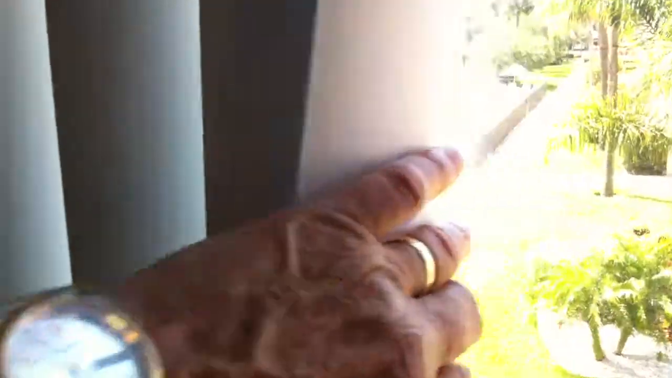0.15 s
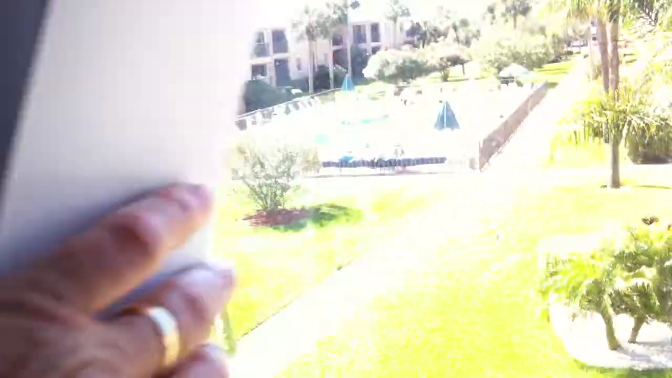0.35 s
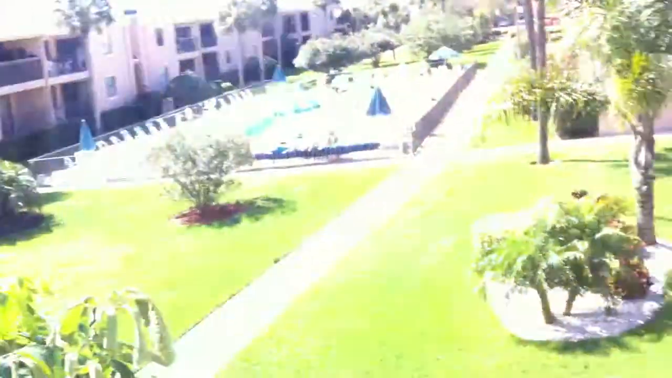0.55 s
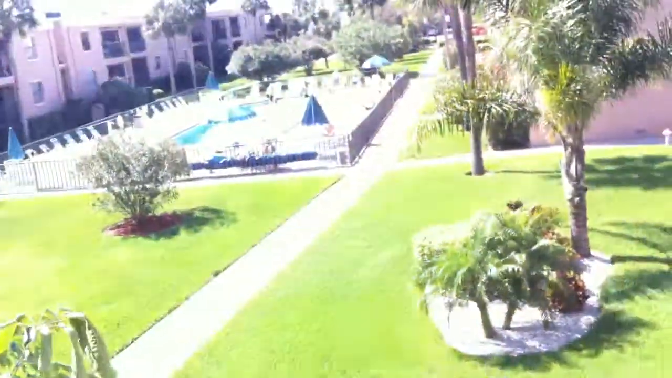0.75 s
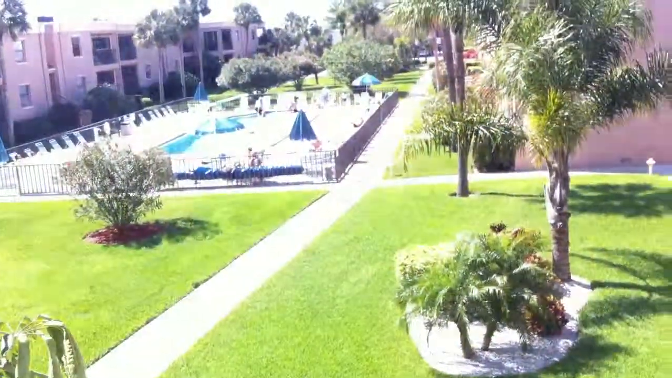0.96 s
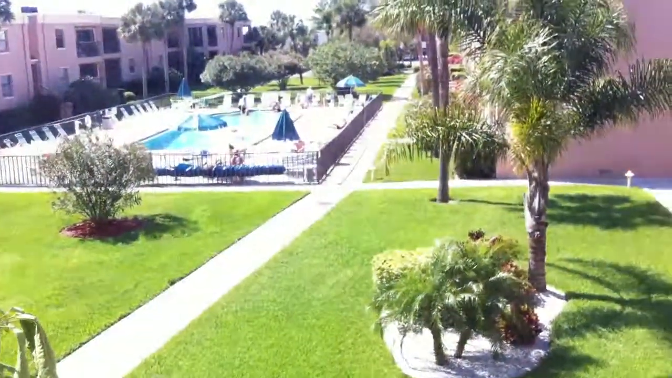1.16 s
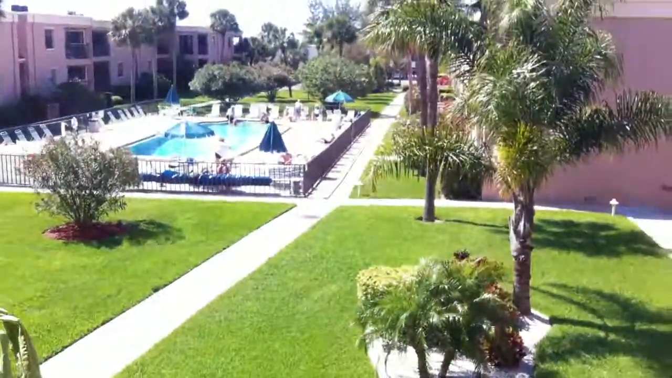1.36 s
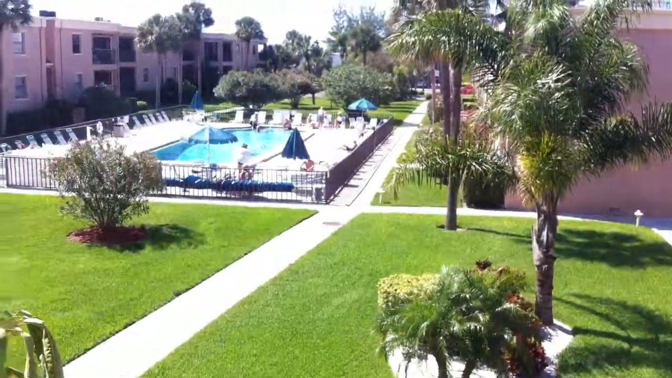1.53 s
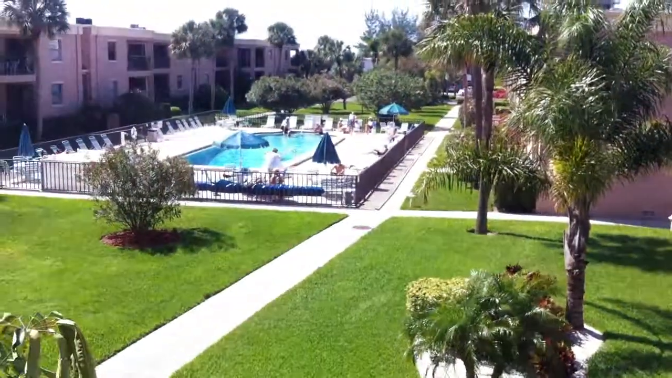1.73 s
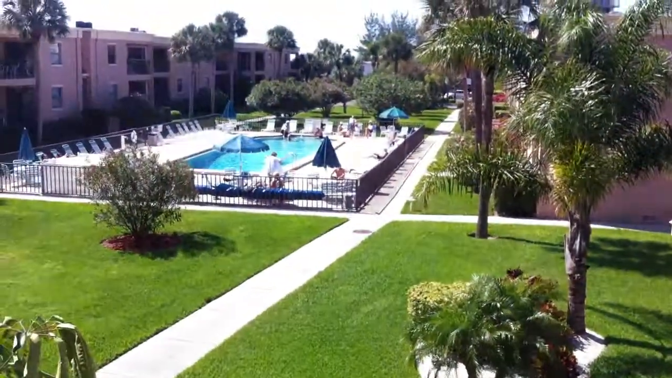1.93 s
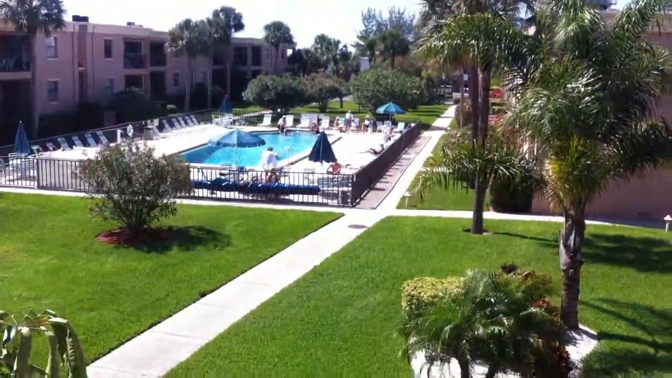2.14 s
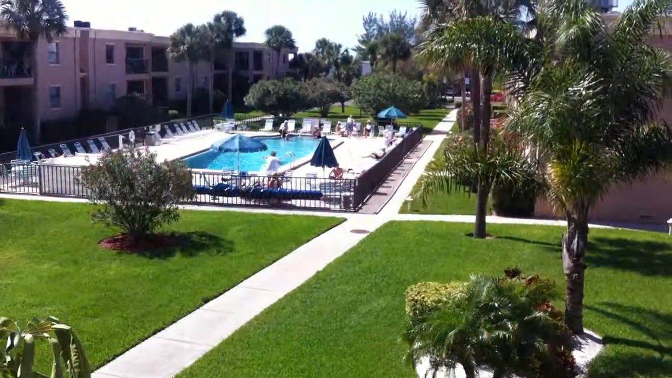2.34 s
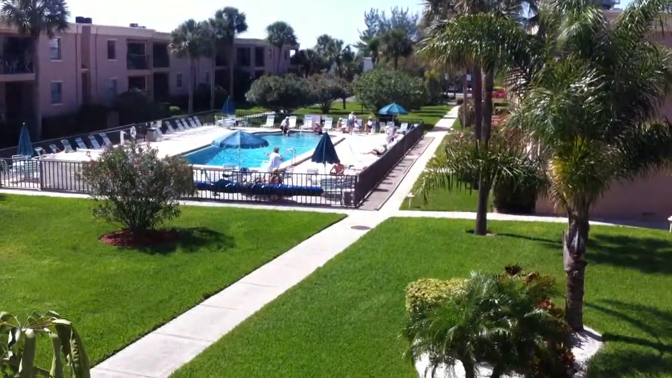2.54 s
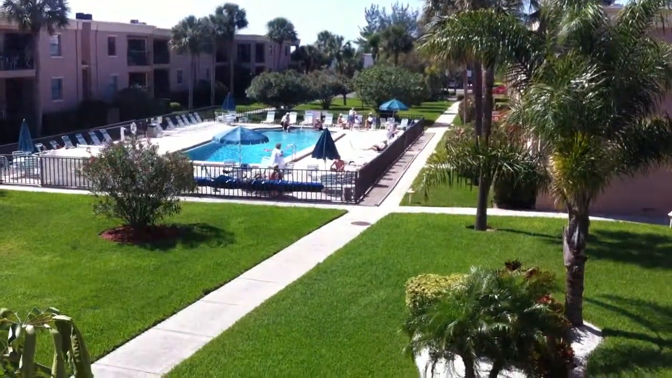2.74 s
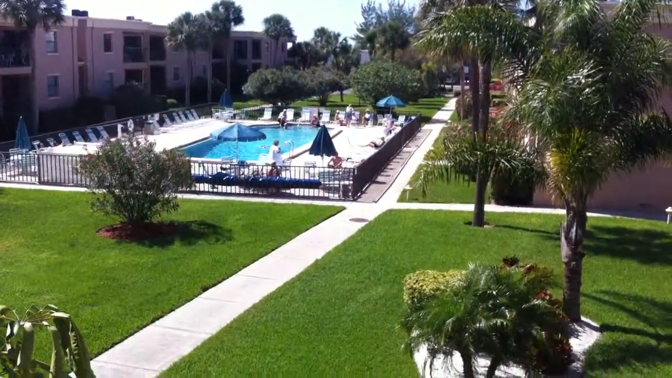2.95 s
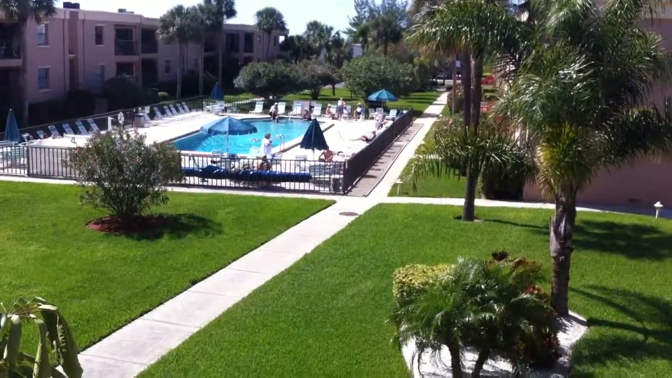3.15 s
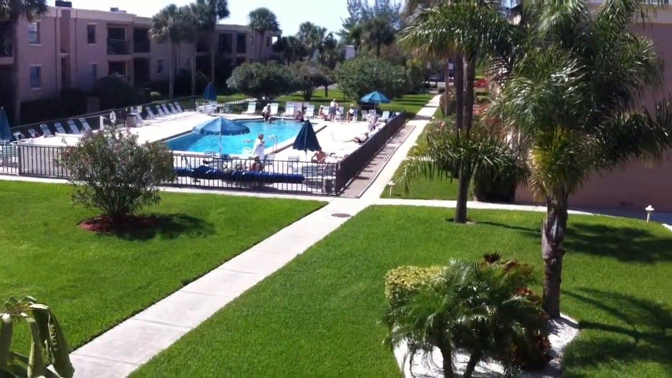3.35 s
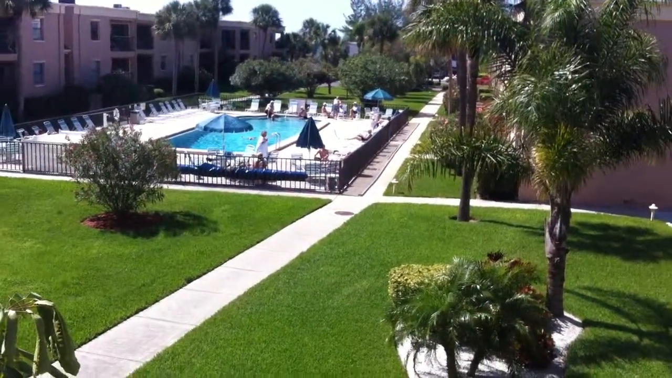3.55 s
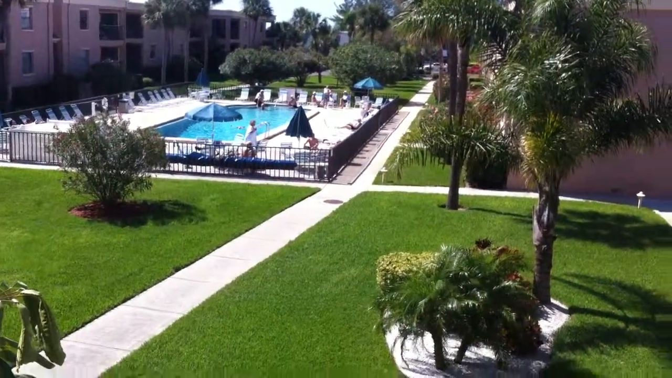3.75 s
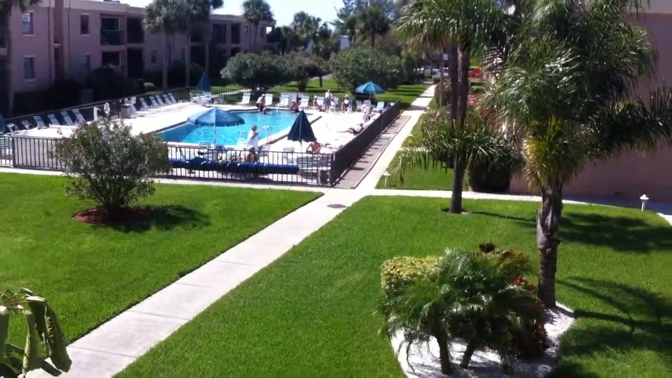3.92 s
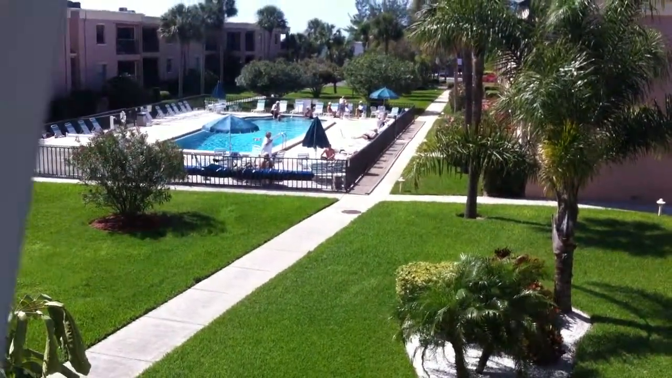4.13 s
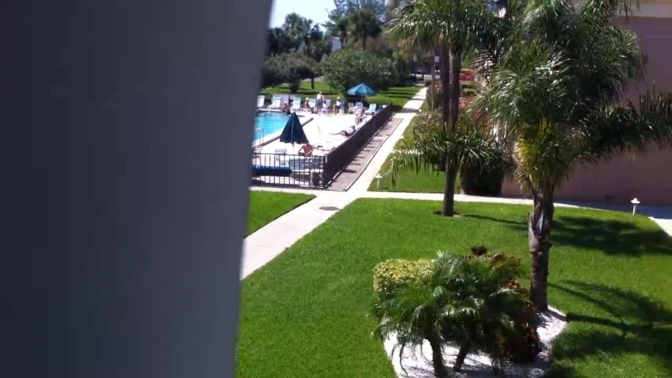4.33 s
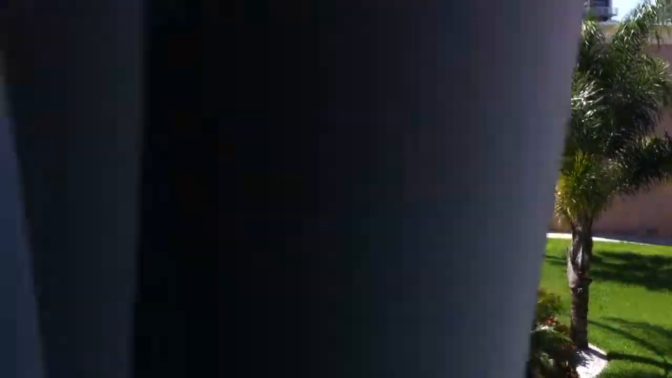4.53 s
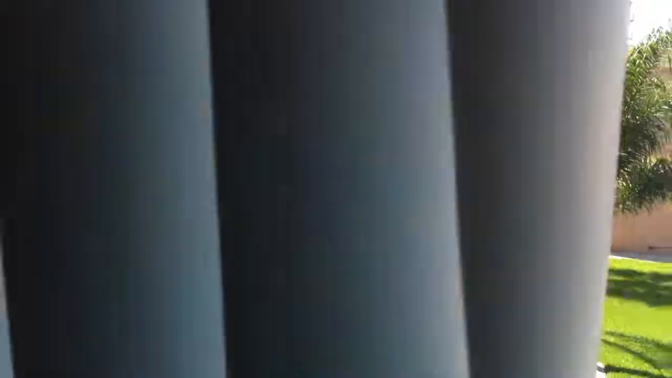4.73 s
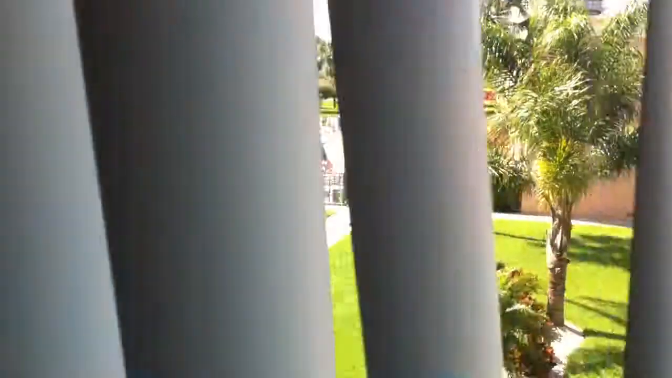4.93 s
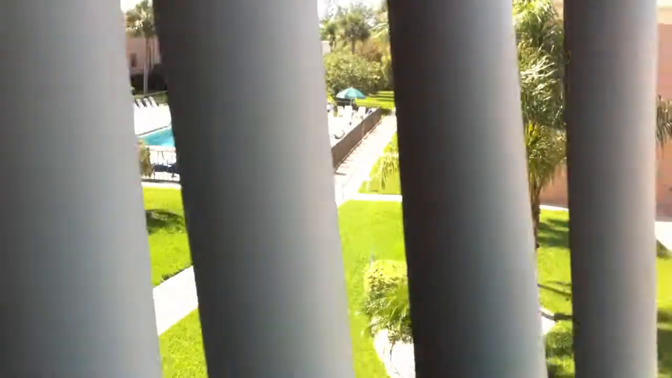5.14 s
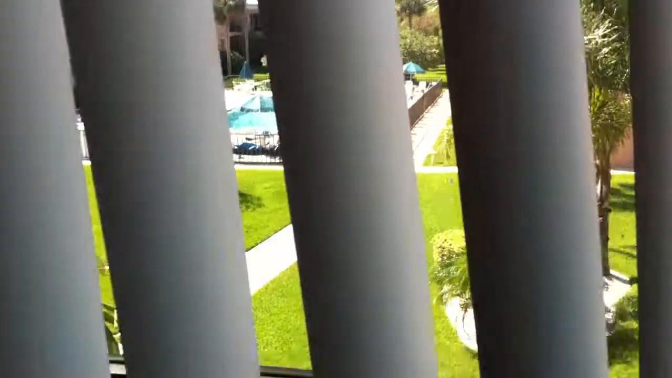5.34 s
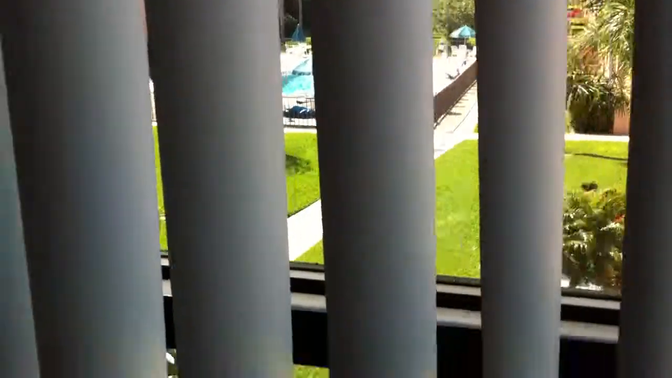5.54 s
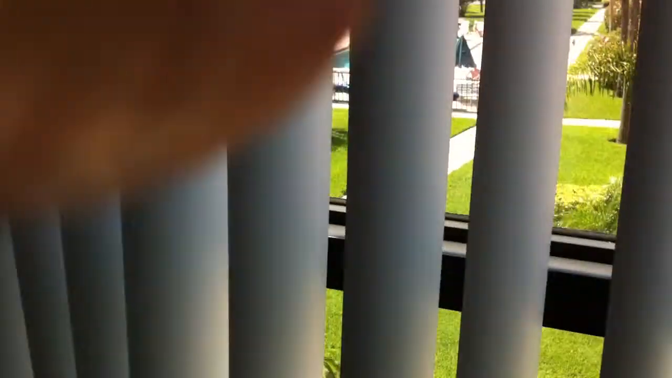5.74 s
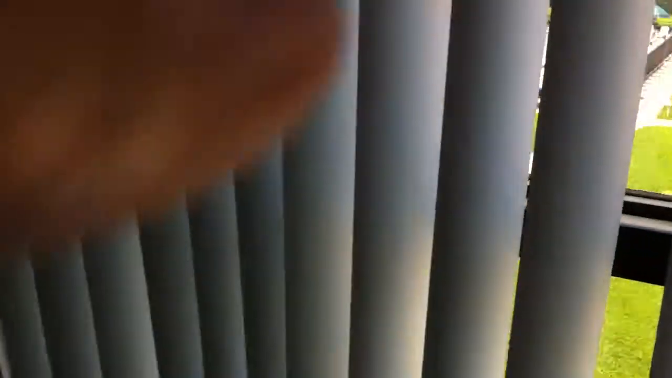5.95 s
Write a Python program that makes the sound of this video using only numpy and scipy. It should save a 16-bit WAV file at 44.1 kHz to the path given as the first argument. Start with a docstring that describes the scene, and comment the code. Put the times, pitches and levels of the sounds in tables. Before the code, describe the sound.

Close up, hanging slats swish and clack in a burst, settle into sparse clicks, then fall back with fuller knocks and ticks.

```python
"""Plastic slats slap, click, tick and swish close by in a small quiet room.
They are vertical blinds: swept aside by hand, they swing and clatter, then are let go and fall back.
Slaps and clicks are noise bursts with clean rings, ticks ring the hangers, and thuds are low sine tones.
The swish is rough, crackling noise; a loose hook clinks and still air adds a faint background."""
import sys
import numpy as np
from scipy import signal
from scipy.fft import rfft, irfft
from scipy.io import wavfile
from scipy.ndimage import uniform_filter1d

SR = 44100
rng = np.random.default_rng(int(sys.argv[2]) if len(sys.argv) > 2 else 0)


def bounce(signal):
    """Save signal as a 16-bit WAV file at the path given by the first command-line argument."""
    frames = np.transpose(np.atleast_2d(signal))
    limited = np.clip(frames, -1, 1)
    pcm = np.round(limited * 32767).astype(np.int16)
    wavfile.write(sys.argv[1], SR, pcm)


N = 268128  # length of the scene in samples
SIZE = 8192  # length of one short sound in samples
T, HZ = np.arange(SIZE) / SR, np.fft.rfftfreq(SIZE, 1 / SR)
ONSET = SR // 25  # the first 40 ms, in samples, over which short sounds are levelled
RING_WIDTH_HZ = 130

# resonances of a hanger: (frequency [Hz], width [Hz], lift [dB])
HANGER_MODES = [(1060, 125, 6), (2220, 70, 3), (2540, 62, 8.7), (3020, 60, 8.3), (3670, 70, 5.3),
                (4380, 110, 3.7), (5580, 90, 7.1), (6850, 160, 4.1), (9900, 190, 3)]


def amp(db):
    """Turns decibels into a gain."""
    return 10 ** (np.asarray(db) / 20)


def unit(x):
    """Scales a signal to an rms (average strength) of 1."""
    return x / np.sqrt(np.mean(x ** 2) + 1e-20)


def read(points, hz):
    """Joins (frequency [Hz], value) points on a log-frequency axis."""
    f, value = np.transpose(points)
    return np.interp(np.log(hz + 1), np.log(f + 1), value)


def add(mix, s, sound):
    """Mixes a sound in at time s, in seconds."""
    part = mix[max(round(s * SR), 0):][:len(sound)]
    part += sound[:len(part)]


def tint(x, colour):
    """Filters a long signal with a frequency curve."""
    gain = amp(read(colour, np.fft.rfftfreq(len(x), 1 / SR)))
    return irfft(rfft(x) * gain, len(x))


def ring(x, gain_db):
    """Filters causally: resonances ring after the blow, never before."""
    log_gain = np.log(amp(np.r_[gain_db, gain_db[-2:0:-1]]))
    # the Hilbert transform finds the phase that puts the response after time zero
    response = np.fft.ifft(np.exp(np.conj(signal.hilbert(log_gain)))).real
    return signal.fftconvolve(x, response[:SIZE // 2])[:SIZE]


def lifts(modes):
    """Draws resonance peaks as a curve in dB over frequency."""
    peaks = 0
    for hz, width, db in modes:
        height = (amp(db) ** 2 - 1).clip(0)
        peaks = peaks + height / (1 + (2 * (HZ - hz) / width) ** 2)
    return 10 * np.log10(1 + peaks)


def dying(age, decay):
    """Stands in for countless overlapping modes: noise whose bands each die at their own speed."""
    hz, noise = np.fft.rfftfreq(len(age), 1 / SR), rfft(rng.standard_normal(len(age)))
    centres, t60s = np.transpose(decay)
    total = np.zeros(len(age))
    for row, t60 in zip(np.eye(len(decay)), t60s):
        share = read(np.c_[centres, row], hz)
        # t60 is the time to fall by 60 dB
        total += irfft(noise * share, len(age)) * amp(-60 * age / t60)
    return total


def contact(contact_s, snap, rise_s, rebounds=0.97):
    """Makes a first snap and quick random rebounds; the slats chatter for the contact time and ring out."""
    # decay of a slat: (frequency [Hz], time to fall by 60 dB [s])
    slat_decay = [(200, 0.14), (700, 0.11), (1800, 0.052), (4000, 0.072), (12000, 0.046)]
    flutter = dying(np.maximum(T - contact_s, 0), slat_decay) * (1 - np.exp(-T / rise_s))
    # on average 450 rebounds per second, fading quickly
    sparse = rng.standard_normal(SIZE) * (rng.random(SIZE) < 450 / SR)
    flutter += rebounds * snap * sparse * np.exp(-T / (2 * contact_s + 0.00084))
    flutter[0] += snap
    return flutter


def voiced(blow, colour_db, bands, levels_db):
    """Colours a blow, then trims it by the strength of its first 40 ms in each frequency band."""
    onset = ring(blow, colour_db)[:ONSET]
    power = 2 * abs(rfft(onset, SIZE)) ** 2 / (SIZE * ONSET)
    trim = []
    for (lo, hi), db in zip(bands, levels_db):
        band_db = 10 * np.log10(power[(HZ >= lo) & (HZ < hi)].sum())
        trim.append((np.sqrt(lo * hi), db - band_db))
    return ring(blow, colour_db + read(trim, HZ))


def sing(hz):
    """Sounds one clean, short-lived mode as a fading sine; rms 1 over its first 40 ms."""
    rise_s, t60_s = 0.0011, 0.044
    tone = (1 - np.exp(-T / rise_s)) * amp(-60 * T / t60_s) * np.sin(2 * np.pi * hz * T)
    return tone / np.sqrt(np.mean(tone[:ONSET] ** 2))


def random_catches(per_s, spread_db):
    """Scatters single pushes of random size and sign at random moments."""
    sizes = amp(spread_db * np.minimum(rng.exponential(1, N), 3))
    return sizes * rng.choice([-1, 1], N) * (rng.random(N) < per_s / SR)


def still_air():
    """Still room air is a steady, faint coloured noise."""
    # spectrum of the air: (frequency [Hz], relative level per Hz [dB])
    air_colour = [(15, -69), (25, -29), (59, -23), (92, -22), (114, -8.5), (190, -1), (229, -10.5),
                  (256, -3), (503, -13), (796, -14.5), (1330, -18), (2220, -20.5), (8590, -20.5),
                  (14800, -25.5), (16000, -22.5)]
    return amp(-62.5) * unit(tint(rng.standard_normal(N), air_colour))


def room(x, build_s=0.00087):
    """A small furnished room answers with a diffuse tail that builds up and dies away."""
    # decay of the room: (frequency [Hz], time to fall by 60 dB [s])
    room_decay = [(200, 0.62), (530, 0.3), (1400, 0.38), (3700, 0.28), (9700, 0.19)]
    # colour of the tail: (frequency [Hz], gain [dB])
    tail_colour = [(130, -1), (200, 2.5), (400, 5.5), (700, 2), (1200, -0.5), (1800, 0.5),
                   (2500, 0.5), (5000, 0.5), (14000, 8.0)]
    age = np.arange(SR * 3 // 4) / SR
    tail = dying(age, room_decay) * (1 - np.exp(-(age / build_s) ** 2))
    tail = tint(tail / np.linalg.norm(tail), tail_colour)
    return signal.fftconvolve(x, tail)[:N]


def stirring(per_s, spread_db):
    """The hangers never hang quite still: faint touches ring them at random moments."""
    # colour of the faintest hanger touches: (frequency [Hz], relative level per Hz [dB])
    stir_colour = [(150, -44), (1000, -8.5), (1500, -10), (2400, -3.5), (4000, -21), (12000, -19)]
    touches = random_catches(per_s, spread_db)
    touch = contact(contact_s=0.0055, snap=0.82, rise_s=0.0026)
    hanger = ring(touch, read(stir_colour, HZ) + lifts(HANGER_MODES))
    return unit(signal.fftconvolve(touches, hanger)[:N])


def clinks(scuff_db, touch_s, rise_s):
    """A loose hook rocks against its carrier: a short noisy scuff and a few brief modes."""
    # clinks of the hook: (time [s], relative level [dB])
    clink_events = [(2.9165, -59), (2.9905, -56.5), (3.06, -61), (3.1715, -57.5)]
    # modes of the hook: (frequency [Hz], average relative level [dB], time to fall by 60 dB [s])
    hook_modes = [(1055, 0, 0.06), (2550, -5, 0.05), (3750, -4.5, 0.055), (5500, -8, 0.05),
                  (5620, -7.5, 0.055), (9380, -7.5, 0.04)]
    # colour of the scuff: (frequency [Hz], relative level per Hz [dB])
    hook_colour = [(200, -25), (1000, -1), (2500, -1), (6000, 0), (10000, -1.5), (16000, -14)]
    mode_spread_db = 2.5  # each touch favours other modes
    out = np.zeros(N)
    swell = 1 - np.exp(-(T / rise_s) ** 2)
    for s, db in clink_events:
        tone = np.zeros(SIZE)
        for hz, mode_db, t60 in hook_modes:
            level_db = mode_db + mode_spread_db * rng.standard_normal()
            tone += amp(level_db - 60 * T / t60) * np.sin(2 * np.pi * (hz * T + rng.random()))
        tone *= swell
        burst = rng.standard_normal(SIZE) * swell * np.exp(-(T / touch_s) ** 2)
        scuff = ring(burst, read(hook_colour, HZ))
        tone /= np.std(tone[:ONSET])
        scuff /= np.std(scuff[:ONSET])
        add(out, s, amp(db) * (tone + amp(scuff_db) * scuff))
    return out


def ticks(lift_db, ring_db, snap):
    """Swaying slats touch softly and ring their hangers, one mode more cleanly than the rest."""
    # light ticks: (time [s], relative level [dB], strongest ring [Hz])
    tick_events = [(0.1522, -39.5, 2500), (0.197, -36.5, 2560), (1.4966, -41, 966), (1.95, -39, 1025),
                   (2.1102, -47, 2470), (2.1263, -42, 2450), (2.2436, -34, 2260), (2.2564, -35.5, 2400),
                   (2.303, -47, 2450), (2.4558, -34, 2380), (2.517, -47, 2350), (2.7487, -33.5, 2500),
                   (3.061, -43, 2350), (3.073, -43, 2200), (3.197, -45.5, 2300), (3.242, -51, 2350),
                   (3.305, -50, 1750), (3.3465, -39.5, 2410), (3.371, -50, 2500), (3.386, -49, 2300),
                   (3.399, -45, 2410), (3.4128, -46, 2450), (3.472, -54, 2400), (3.6395, -56, 2240),
                   (3.658, -54, 2400), (4.902, -44, 2100), (4.9213, -40, 2200), (5.301, -40, 1580),
                   (5.349, -55, 2680), (5.456, -47, 2530), (5.691, -44, 2350), (5.7029, -41.5, 2160),
                   (5.7537, -38.5, 2100), (5.7925, -40, 2050), (5.9234, -39.5, 920), (5.96, -37, 2080),
                   (6.0073, -44.5, 1100)]
    # colour of a tick: (frequency [Hz], relative level per Hz [dB])
    tick_colour = [(200, -13.5), (700, -4), (1200, -7), (2400, 4), (3400, -1.5), (6000, 2), (10000, 0),
                   (16000, -24)]
    bands = [(900, 5000), (5000, 14000)]  # Hz
    out, hanger_db = np.zeros(N), read(tick_colour, HZ)
    for s, db, ring_hz in tick_events:
        strongest = (ring_hz, 2 * RING_WIDTH_HZ, lift_db)
        colour_db = hanger_db + lifts(HANGER_MODES + [strongest])
        touch = contact(contact_s=0.0022, snap=snap, rise_s=0.0029)
        treble_db = -43 + 0.2 * db  # the treble of a tick hardly grows with its level
        add(out, s, voiced(touch, colour_db, bands, [db, treble_db]))
        add(out, s, amp(db + ring_db) * sing(ring_hz))
    return out


def thuds():
    """A whole slat bows and springs back in one low mode, a fading sine."""
    # thuds: (time [s], level before rise and decay [dB], pitch [Hz], time to fall by 60 dB [s])
    thud_events = [(.285, -35, 245, .08), (.385, -33, 205, .09), (.685, -49, 170, .1),
                   (0.737, -32, 153, 0.13), (.724, -19, 441, 0.069), (.739, -26, 600, 0.067),
                   (0.748, -35, 237, 0.049), (.975, -46, 170, .09), (1.116, -37, 196, 0.11),
                   (1.175, -48, 190, .12), (1.328, -47, 185, .13), (1.5, -47, 180, .1),
                   (1.63, -39.5, 159, 0.066), (1.765, -48, 195, .12), (1.942, -47, 185, 0.11),
                   (2.114, -46, 397, 0.17), (3.365, -53, 270, .15), (4.465, -34, 260, 0.18),
                   (4.545, -36, 267, 0.5), (4.566, -26, 510, 0.088), (4.55, -27, 640, .22),
                   (4.727, -28, 200, 0.055), (4.81, -50, 200, .1), (4.96, -29, 175, .09),
                   (5.603, -45, 363, 0.15)]
    out, rise_s = np.zeros(N), 0.0051
    for s, db, hz, t60 in thud_events:
        shape = amp(db - 60 * T / t60) * (1 - np.exp(-T / rise_s))
        add(out, s, shape * np.sin(2 * np.pi * hz * T))
    return out


def slide(lurch_db, grain_db, catch_size, catches_per_s, spread_db):
    """Plastic rubs on plastic: a fine swish, crackling where the edges stick and slip."""
    # strokes: (start [s], swell [s], coasting time [s], relative level [dB], extra hiss [dB])
    strokes = [(0, 0.0021, 0.12, -41, -6.5), (0.285, 0.014, 0.16, -32, 7.5), (0.312, 0.12, 0.22, -29.5, 0),
               (3.905, .03, .03, -52, 1), (3.955, 0.055, 0.15, -44.5, -0.5),
               (4.246, 0.033, 0.04, -38.5, -4.5), (4.26, 0.26, 0.1, -43.5, 0),
               (4.722, 0.043, 0.15, -46.5, -6), (5.13, 0.018, 0.41, -53.5, -1)]
    # colour of the rubbing: (frequency [Hz], relative level per Hz [dB])
    slide_colour = [(40, -37), (90, -31), (150, -16), (230, -1), (330, 2.5), (600, 0.5), (1200, 2.5),
                    (2000, 6.5), (3000, 6), (4500, 3.5), (8500, -10), (12000, -12), (16000, -20)]
    swell_power, coast_power = 0.36, 1.97  # speed builds up and coasts away
    hiss_power_law = 1.35  # hiss follows the speed more steeply than the swish
    t = np.arange(N) / SR
    grain = amp(grain_db * unit(uniform_filter1d(rng.standard_normal(N), size=160)))
    # the slats drag unevenly
    grain *= amp(lurch_db * unit(uniform_filter1d(rng.standard_normal(N), size=1100)))
    catches = catch_size * random_catches(catches_per_s, spread_db)
    rub = tint(rng.standard_normal(N) * grain + catches, slide_colour)
    # split at 6 kHz into swish below and hiss above
    body = signal.sosfiltfilt(signal.butter(4, 6000, fs=SR, output="sos"), rub)
    body_power, hiss_power = np.zeros(N), np.zeros(N)
    for s, swell_s, coast_s, db, hiss_db in strokes:
        swell = np.clip((t - s) / swell_s, 0, 1) ** swell_power
        coasting = (1 + np.maximum(t - s - swell_s, 0) / coast_s) ** coast_power
        speed = swell / coasting
        body_power += (amp(db) * speed) ** 2
        hiss_power += (amp(db + hiss_db) * speed ** hiss_power_law) ** 2
    return unit(body) * np.sqrt(body_power) + unit(rub - body) * np.sqrt(hiss_power)


def rail(x):
    """The slat faces and the head rail add their resonances to the rubbing."""
    # thin rings of the head rail: (frequency [Hz], width [Hz], lift [dB])
    rail_modes = [(2340, 24, 1.5), (3100, 9.5, 6.5), (5275, 13, 7), (5825, 12, 5), (8560, 26, 9)]
    # broad resonances of the rasping faces: (frequency [Hz], width [Hz], lift [dB])
    rasp_modes = [(2300, 350, 2), (3050, 450, 2.3)]
    response = ring(np.ones(1), lifts(rail_modes + rasp_modes))
    return signal.fftconvolve(x, response)[:N]


def collisions(table, bands, balance, colour, snap, rise_s, lift_db):
    """Each blow gives a clack of all the slat modes, and clean rings that depend on where it lands."""
    # bending modes of a slat: (frequency [Hz], width [Hz], lift [dB])
    slat_modes = [(263.3, 16, 3), (380, 20, 3.5), (505, 20, 5), (632, 40, 9), (905, 50, 3), (1030, 90, 2.5),
                  (1400, 200, 2.5), (1770, 350, 3), (2100, 120, 2)]
    clacks, rings, slat_db = np.zeros(N), np.zeros(N), read(colour, HZ).clip(-70)
    side = np.arange(len(bands)) - 2  # below (negative) or above (positive) the main band
    for s, db, body_db, edge_db, contact_s, ring_db, *rings_hz in table:
        levels_db = db + np.array(balance) + body_db * (side < 0) + edge_db * (side > 0)
        # the shorter the contact, the harder the first snap
        hardness = (0.002 / (contact_s + 1e-4)) ** 0.63
        # resonances around the clean rings, wider at higher pitch
        near = [(hz, RING_WIDTH_HZ * np.sqrt(hz / 1700), lift_db) for hz in rings_hz]
        blow = contact(contact_s, snap * hardness, rise_s)
        add(clacks, s, voiced(blow, slat_db + lifts(slat_modes + near), bands, levels_db))
        for k, hz in enumerate(rings_hz):
            add(rings, s, amp(db + ring_db - 2.5 * k) * sing(hz))  # a second ring is 2.5 dB weaker
    return np.array([clacks, rings])


def clicks():
    """Slat edges click together: bright blows, each with one clean ring."""
    # clicks: (time [s], relative level [dB], extra body [dB], extra edge [dB], contact time [s],
    # ring strength against the level [dB], ring [Hz])
    click_events = [(.0204, -37.5, 2.5, 6, .005, -12, 5450), (.2843, -34.5, -6, 4, 0.00026, -9, 3240),
                    (.304, -28, -13, -10, .0037, -5, 5825), (.343, -34, -12, 7, .002, -9, 5270),
                    (.354, -32, -12, 7, .004, -9, 4810), (.3685, -21, -3.5, 5.5, 0.0048, -8, 5730),
                    (.388, -25.5, 7, -2, 0.0075, 1.5, 2300), (.4135, -29.5, 7.5, -16, 0.0016, -4, 3070),
                    (.447, -34, -1, 7, .005, -5, 2500), (.4547, -23.5, 0.5, 3, .0075, -11, 1500),
                    (.483, -38, -10, 5, .003, -9, 5270), (.537, -35.5, -3, -9, .003, -8, 2450),
                    (.567, -41.5, -9, 8, .002, -14, 2360), (.597, -44, -6, 8, .002, -10, 2580),
                    (.623, -42, -4, 8, 0.0017, -11, 2120), (.66, -41, 1, 2, 0.0051, -4, 2400),
                    (.773, -40, -12, 6.5, 0.0033, -8, 4900), (.798, -46, 2, -10, .003, -4, 2380),
                    (.826, -48, 4, 0, .004, -4, 1950), (.895, -43, 6, 1, .006, -2, 1800),
                    (.8522, -34.5, 7.5, 5.5, .0025, 8, 1780), (.919, -40.5, 2, 8.5, 0.0032, 2, 1740),
                    (.984, -33, -2.5, -2, 0.00031, -13, 3500), (.989, -43, 6, 2, .002, 7.5, 1650),
                    (1.039, -37.5, 6, 2, 0.014, 1.5, 1630), (1.071, -37, 1.5, -8, 0.001, -8, 2570),
                    (1.113, -41.5, 8, 0.5, 0.0072, -17, 1530), (1.147, -44, 5, -5, .007, -3, 2050),
                    (1.1636, -37.5, 2, 0, .0021, -5, 1960), (1.197, -37.5, 2.5, 1, 0.0017, -0.5, 1587),
                    (1.222, -53, 6, -6, .003, -1, 1700), (1.262, -44, 4, -2, 0.004, -7, 2400),
                    (1.282, -44.5, 9.5, -18, 0.0021, -9, 2090), (1.3506, -45.5, 2.5, -2, 0.0026, -13, 1710),
                    (1.58, -47, -2, -1.5, 0.002, -3, 3210), (1.631, -57.5, 14, 15, 0.00006, -10, 5400),
                    (1.647, -50, 0, -2, .003, -6, 2500), (1.661, -48, -1, 4.5, 0.003, -16, 5700),
                    (1.72, -47, -2, 2, 0.025, -7, 2230), (1.803, -49, -3, -10, .002, -4, 2400),
                    (1.815, -48.5, -1, 0, 0.002, -9, 1650), (2.108, -54, -6, 5, .003, -8, 2500),
                    (2.168, -46, -2, 1, .003, -8, 2900), (2.177, -43.5, -1, -2, 0.004, -1, 2386),
                    (2.428, -48.5, 2, -2, .004, -3, 2430), (2.651, -42, -12, -13, 0.0066, -1, 2960),
                    (2.691, -52, -2, -10, .003, 1, 2940), (3.2886, -47, -16, -0.5, .0003, -26, 3700),
                    (4.163, -38.5, -3.5, 2, 0.0065, -8, 3130), (4.192, -37, -1, 2.5, 0.011, -18, 5400),
                    (4.2586, -45.5, 6.5, 13, 0.0029, -6, 2480), (4.487, -35, -2, -9, 0.0017, -2, 4460),
                    (4.695, -39.5, 7, -10, 0.0034, -10, 3020), (4.808, -39.5, 1, -13, 0.0018, -6, 3024),
                    (4.981, -39, -4, 8, .005, -12, 1800), (4.993, -33, -4, 7, 0.011, -12, 1530),
                    (5.051, -44.5, 0, 7.5, 0.00045, -2, 1560), (5.132, -35, -12.5, 5.5, 0.0023, -4.5, 4900),
                    (5.158, -49, 4, -11, .018, -3, 2050), (5.189, -40.5, -2.5, -14, 0.0031, -10, 2300),
                    (5.348, -56, 3.5, 9, 0.0041, -8, 6420)]
    # frequency bands: (low end [Hz], high end [Hz])
    click_bands = [(120, 500), (500, 2200), (2200, 6000), (6000, 16000)]
    # usual balance, one value for each band: (relative level [dB])
    click_balance = [-17.5, -1.5, 0, -5]
    # broad colour: (frequency [Hz], relative level per Hz [dB])
    click_colour = [(35, -44), (80, -24), (160, -10), (450, -16), (900, -8.5), (1250, -10), (1750, -3.5),
                    (2400, 1), (3900, 3.5), (8300, 1), (13000, -6), (16000, -15.5)]
    return collisions(click_events, click_bands, click_balance, click_colour,
                      snap=5.8, rise_s=0.00023, lift_db=8)


def slaps():
    """Slats slap face to face: fuller blows, each with one or two clean rings."""
    # slaps: (time [s], relative level [dB], extra body [dB], extra edge [dB], contact time [s],
    # ring strength against the level [dB], strongest ring [Hz], second ring if any [Hz])
    slap_events = [(.18, -55.5, 6, -8, 0.0014, -9, 1700, 810),
                   (.284, -34.5, -8.5, -0.5, .003, 0.5, 663, 1813),
                   (.7218, -25.5, -7, 10, 0.0036, -0.5, 1870, 1650),
                   (.7305, -32.5, -8.5, 12, 0.0043, -0.5, 1315, 2000),
                   (.91, -39, 1.5, 6, 0.016, -9, 1064, 620), (1.274, -49, -10, -6, .002, -1, 1000),
                   (1.423, -49, 3, 5, .0034, -3, 1510, 900),
                   (1.4345, -34.5, -1.5, -2.5, .0055, -0.5, 1487, 645),
                   (1.751, -41, 1, 1, 0.012, -2.5, 650, 1180),
                   (1.779, -48.5, 7, 5.5, .0078, 3.5, 656, 1130),
                   (1.889, -53, 1.5, 11.5, 0.033, -1, 1106, 1210),
                   (2.103, -55, 7, 6, 0.0097, 1.5, 860, 1210), (2.191, -47.5, 2, 5, 0.022, -3, 843, 617),
                   (2.397, -48, -0.5, -11, .0059, -6, 845, 1110),
                   (2.436, -47, 1.5, 1, 0.0016, 1, 1034, 644),
                   (2.7035, -31.5, -8.5, -5, 0.0045, -11, 1894, 1160),
                   (2.749, -51, 6.5, -1, .008, -1, 626, 910),
                   (3.896, -36, -2.5, -9, 0.011, -3.5, 1320, 1750),
                   (4.461, -32, -2, -0.5, 0.0072, -10.5, 640, 1134),
                   (4.534, -32, 1, 1.5, 0.003, -13, 1410, 850),
                   (4.541, -25.5, -5, -4.5, 0.0071, -6, 1020, 1390),
                   (4.55, -30, -3, 1, 0.0024, -4, 1640, 2310),
                   (4.564, -27.5, -3, -1, 0.0059, -1.5, 657, 1670),
                   (4.612, -41.5, 1, 7, .008, -3, 1840, 1020),
                   (4.626, -33.5, 0.5, 1, 0.0066, -6.5, 506, 2370), (4.675, -44, -4, -6, .003, -3, 1380),
                   (4.725, -42.5, -1.5, 8, 0.0039, -2, 1776, 2220),
                   (4.957, -25.5, -5, -1, 0.017, -7, 717, 920),
                   (5.596, -42, -3, -19, 0.002, -8.5, 1630, 1410),
                   (5.6015, -39.5, -4.5, -7.5, 0.0026, -0.5, 1025, 1400),
                   (5.816, -33, -8, -13.5, 0.009, -10, 1610, 870)]
    # frequency bands: (low end [Hz], high end [Hz])
    slap_bands = [(100, 330), (330, 900), (900, 2200), (2200, 6000), (6000, 16000)]
    # usual balance, one value for each band: (relative level [dB])
    slap_balance = [-8.5, -2, -1.5, -6, -14]
    # broad colour: (frequency [Hz], relative level per Hz [dB])
    slap_colour = [(35, -26.5), (85, -25), (135, -5), (185, 0), (250, -0.5), (600, -2.5), (800, 0.5),
                   (1050, 1), (1700, -3.5), (2300, -4), (3000, -11), (4000, -12), (7000, -28.5),
                   (10000, -32.5), (16000, -49.5)]
    return collisions(slap_events, slap_bands, slap_balance, slap_colour,
                      snap=3.1, rise_s=0.00057, lift_db=3.0)


def scene():
    """Mixes all layers; the clacks and the light touches also feed the room."""
    light = amp(-73) * stirring(per_s=28, spread_db=3.3)
    light += amp(-5.5) * clinks(scuff_db=0.5, touch_s=0.011, rise_s=0.004)
    light += amp(-17.0) * ticks(lift_db=9.5, ring_db=-8.5, snap=3.6)
    swish = amp(-5.3) * slide(lurch_db=0.8, grain_db=1.8, catch_size=2.3,
                              catches_per_s=520, spread_db=3.5)
    click_clacks, click_rings = amp(-9.0) * clicks()
    slap_clacks, slap_rings = amp(-5.5) * slaps()
    echo = room(amp(-9.0) * slap_clacks + amp(-8.5) * click_clacks + amp(-9) * light)
    background = still_air() + echo + light
    blows = click_clacks + click_rings + slap_clacks + slap_rings
    return (background + thuds() + rail(swish) + blows)[None]


def record(dry):
    """Removes the sound above about 16.2 kHz, the recorder's band limit."""
    low_pass = signal.firwin(511, 16200, window=("kaiser", 9), fs=SR)
    return signal.oaconvolve(dry, low_pass[None], "same")


dry = scene()
out = record(dry)
bounce(out)
```